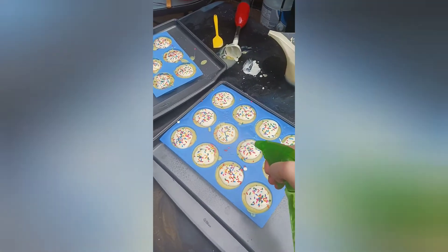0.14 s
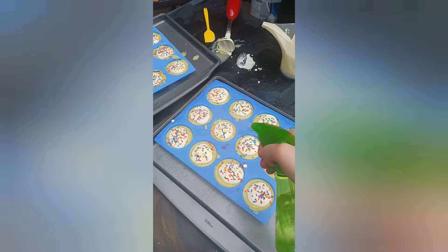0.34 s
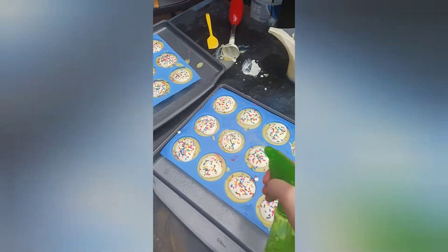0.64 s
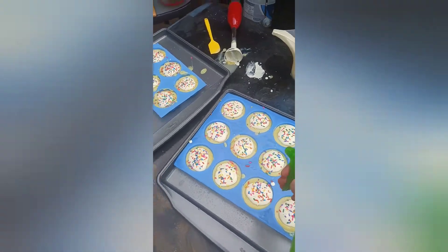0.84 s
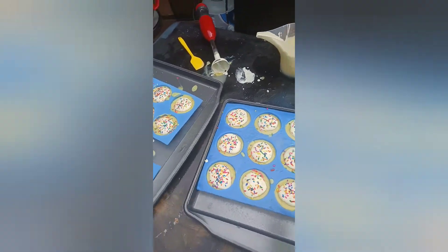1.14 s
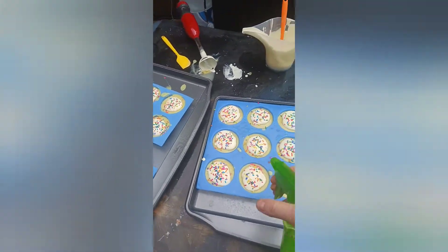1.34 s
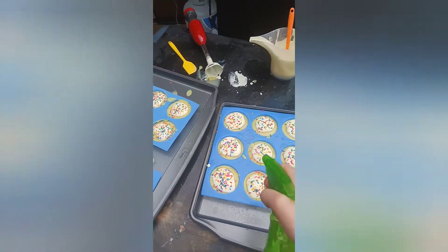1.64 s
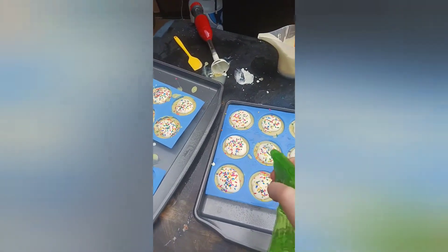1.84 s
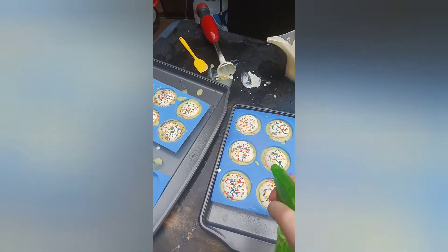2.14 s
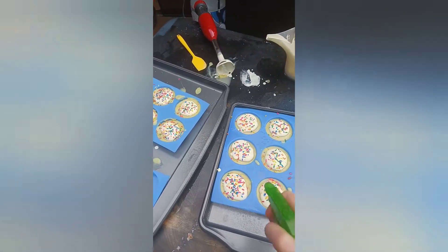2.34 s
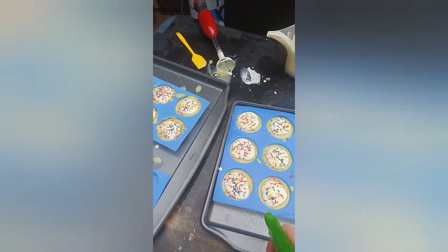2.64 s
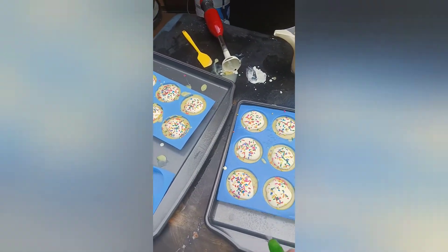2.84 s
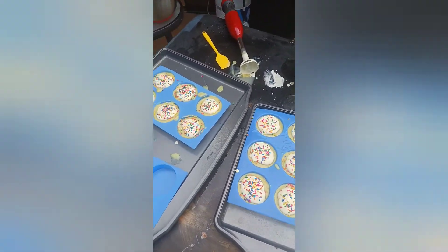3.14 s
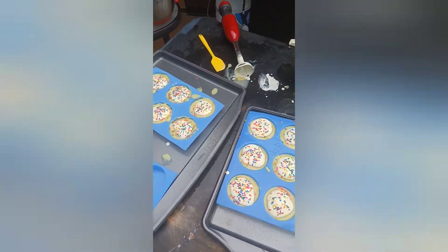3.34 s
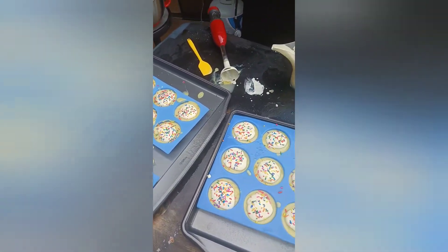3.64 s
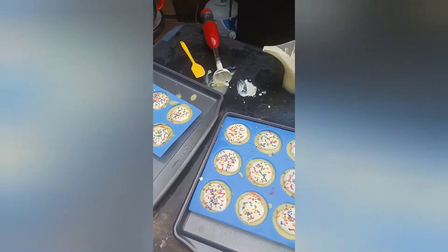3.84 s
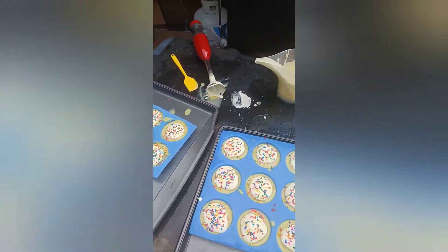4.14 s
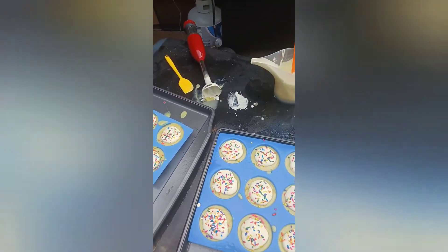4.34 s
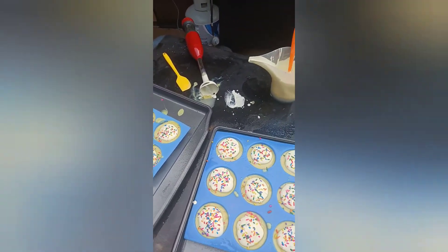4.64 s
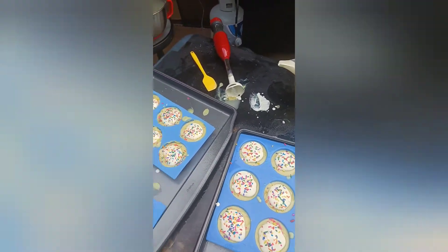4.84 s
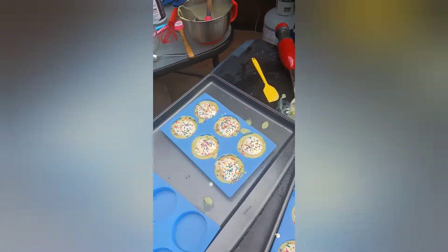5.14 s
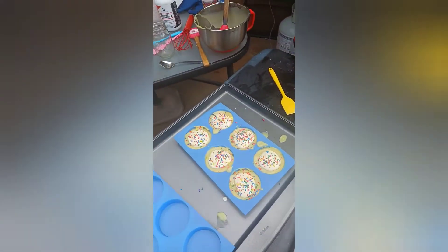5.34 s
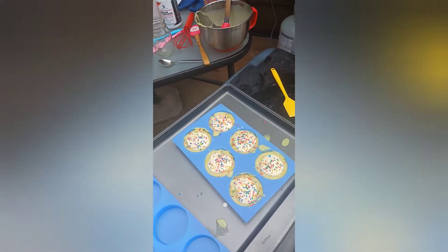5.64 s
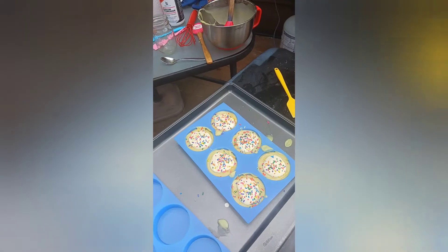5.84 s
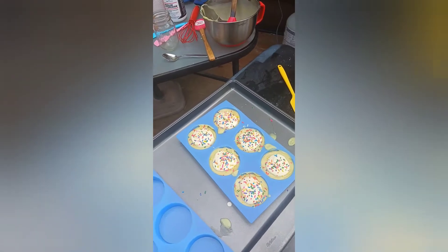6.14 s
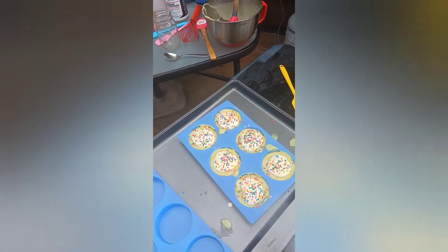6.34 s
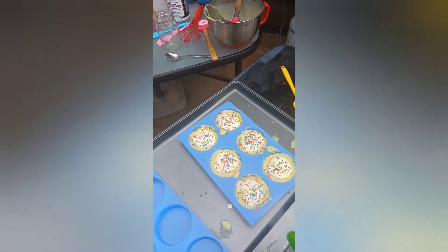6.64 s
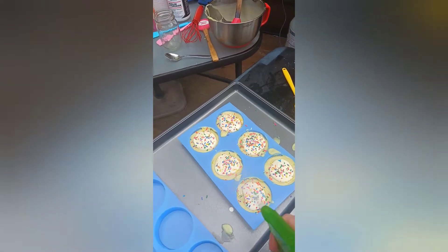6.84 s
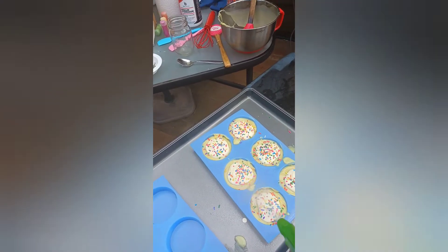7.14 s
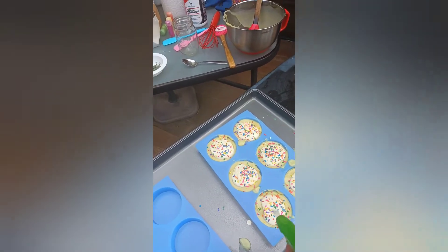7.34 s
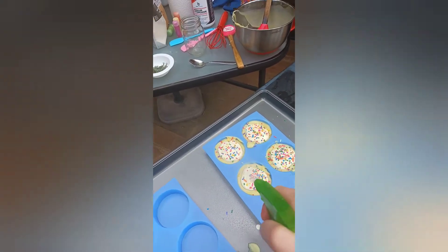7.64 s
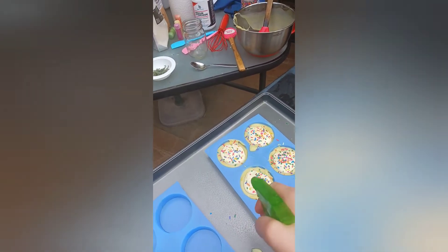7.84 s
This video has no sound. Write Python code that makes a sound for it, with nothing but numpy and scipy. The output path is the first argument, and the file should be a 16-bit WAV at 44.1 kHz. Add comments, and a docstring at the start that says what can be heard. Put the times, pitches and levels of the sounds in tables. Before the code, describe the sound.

A plastic trigger spray bottle works close to the microphone outdoors for about eight seconds. From 0 to 1.2 s the squirts are uneven and sputtering, broken by air spits and small crackles. A pause with a soft wet rustle follows until about 1.5 s, then pumping resumes, spluttery at first. From about 2.5 s it becomes a regular beat of nearly four squeezes a second: hollow plastic knock, snapping spit, bright airy hiss of a tenth of a second, then a faint gurgling suck as the trigger returns. A short gap falls near 4.8 to 5.1 s, and the even rhythm continues to the end. The spray is crisp on the left. The right is muffled and much boomier: irregular deep thumps, strongest around 0.5 to 0.8, 3.4, 4.5, 4.9 and 5.7 s, with cover rattle and low wind rumble. Faint background hiss stays beneath.

```python
"""Trigger sprayer beside two ports

A trigger bottle is pumped about four times a second outdoors. The open left port hears the valve
knock, the nozzle spit and hiss and the pump refill: coloured noise under level curves, and ringing modes.
The covered right port booms with handling and wind, and passes the bottle muffled.
Table levels in dB apply ahead of the port gain."""
import sys
import numpy as np
from scipy import signal
from scipy.fft import rfft, irfft, next_fast_len
from scipy.io import wavfile

SR = 44100
rng = np.random.default_rng(int(sys.argv[2]) if len(sys.argv) > 2 else 0)


def waveform_to_disk(signal):
    """Save audio, clipped to [-1, 1], as 16-bit WAV at the path in sys.argv[1]."""
    frames = np.transpose(np.atleast_2d(signal))
    scaled = np.clip(frames, -1, 1) * 32767
    samples = np.round(scaled).astype(np.int16)
    wavfile.write(sys.argv[1], SR, samples)


N = 351918


def amp(db):
    """Decibels to gain."""
    return 10 ** (np.asarray(db) / 20)


def in_time(rows):
    """Interpolate each column of a curve at every sample; the first column is time in seconds."""
    s, *columns = np.transpose(rows)
    return [np.interp(np.arange(N) / SR, s, column) for column in columns]


def coloured(x, spectrum):
    """Filter by a (Hz, dB) spectrum, interpolated over log frequency."""
    size = next_fast_len(N)
    hz, db = np.transpose(spectrum)
    bin_hz = np.arange(size // 2 + 1) * SR / size
    gain = amp(np.interp(np.log(bin_hz + 1), np.log(hz), db))
    return irfft(rfft(x, size) * gain, size)[:N]


def noise(spectrum):
    """Steady coloured noise of rms 1."""
    x = coloured(rng.standard_normal(N), spectrum)
    return x / x.std()


def flicker(rate_hz):
    """Noise smoothed by two poles at rate_hz, scaled to spread 1."""
    r = np.exp(-2 * np.pi * rate_hz / SR)
    x = signal.lfilter([1], [1, -2 * r, r * r], rng.standard_normal(N + SR))[SR:]
    return x / x.std()


def patchy(spectrum, patch_db, rate_hz):
    """Coloured noise whose half-octave bands from 500 Hz up swell and sink independently."""
    whole = rfft(noise(spectrum))
    hz = np.arange(N // 2 + 1) * SR / N
    edges_hz = 500 * 2 ** np.arange(0, 5.6, .5)
    bands = [irfft(whole * ((hz >= low) & (hz < high)), N) for low, high in zip(edges_hz, edges_hz[1:])]
    return sum(band * amp(patch_db * flicker(rate_hz)) for band in bands)


def ringing(hz, t60_s, count):
    """A decaying sine of initial height 1."""
    t = np.arange(count) / SR
    return np.sin(2 * np.pi * hz * t) * amp(-60 * t / t60_s)


def plateau(t, s, length_s, top, rise_per_s, fall_per_s):
    """A level that climbs in a straight line to a flat top and sinks again."""
    return top - rise_per_s * np.maximum(s - t, 0) - fall_per_s * np.maximum(t - s - length_s, 0)


def add(out, s, sound):
    """Mix a sound in at a time in seconds."""
    at = round(s * SR)
    out[at:at + len(sound)] += sound[:N - at]


# Sputter from air in the liquid. Each row: time in seconds, depth in dB.
SPUTTER = [(0, 5), (1.5, 5), (3, 6), (3.6, 2), (5, 2), (8, 1)]
# Jet, refill, liquid and gurgle spectra. Each row: frequency in Hz, density in dB per Hz.
JET_SPECTRUM = [(2350, -42), (4000, -10), (4900, -14), (5900, -12.5), (7900, -10.5), (8900, -15),
                (10300, -7), (12600, 1), (14000, -4.5), (15700, -3), (16200, -67), (16500, -38)]
REFILL_SPECTRUM = [(2350, -49), (4000, -40), (4700, -9.5), (5400, -9.5), (6100, -5), (7770, -7),
                   (8900, -0.5), (10000, -3.5), (12200, -3), (13600, -1), (15700, -8), (16200, -39)]
LIQUID_SPECTRUM = [(530, -54), (900, -20), (1300, -9), (1650, -6), (2000, -7), (2600, -3), (3300, -3),
                   (4300, -5.5), (5500, -5), (7150, -30), (12100, -100)]
GURGLE_SPECTRUM = [(700, -23.5), (1300, -15.5), (1750, -6.5), (2100, -11.5), (2480, -2), (2800, -6.5),
                   (3200, -3), (3500, -7.5), (3850, -13), (4500, -13.5), (5400, -8.5), (6200, -10.5),
                   (8000, -48)]
REFILL_BELOW_DB, REFILL_BLEND_DB = -60, 2.0
REFILL_UNEVENNESS_DB = 3


def spray():
    """Squeezes force out a bright jet hiss over liquid noise; in the quiet part the pump sucks up liquid."""
    hiss_db, liquid_db, rustle = pump()
    jet = 1 / (1.5 + np.exp((REFILL_BELOW_DB - hiss_db) / REFILL_BLEND_DB))  # power share, at most 2/3
    depth_db = jet * in_time(SPUTTER)[0] + (1 - jet) * REFILL_UNEVENNESS_DB
    sputter = 2 * np.tanh(flicker(74) / 2)  # bounded swings

    bright = np.sqrt(jet) * patchy(JET_SPECTRUM, patch_db=0.99, rate_hz=14.0)
    bright += np.sqrt(1 - jet) * noise(REFILL_SPECTRUM)
    bright *= amp(depth_db * (sputter + 0.59 * flicker(210)))

    broad = np.clip(np.maximum(jet, rustle), 0, 1)
    dull = np.sqrt(broad) * patchy(LIQUID_SPECTRUM, patch_db=2.27, rate_hz=15.4)
    dull += np.sqrt(1 - broad) * patchy(GURGLE_SPECTRUM, patch_db=1.88, rate_hz=8.0)
    dull *= amp(liquid_db + depth_db * (0.72 * sputter + 0.15 * flicker(86)))
    return amp(hiss_db) * (bright + dull)


# Trigger squeezes. Each row: valve open in seconds, time to full pressure in seconds, length in seconds
# (at least the time to full pressure), hiss on opening in dB, hiss at full pressure in dB,
# liquid noise at full pressure in dB relative to the hiss.
SQUEEZES = [(0.0, 0.016, 0.065, -67, -53, -17), (0.043, 0.056, 0.088, -61.5, -42.5, -14.5),
            (0.287, .01, 0.12, -51, -55.5, -3.5), (0.373, 0.024, 0.041, -56, -44, -11),
            (0.622, .003, 0.0076, -48, -47, -16.5), (0.658, 0.014, .02, -61, -56, -1),
            (0.682, 0.013, 0.026, -49, -35.5, -10.5), (0.752, 0.0084, 0.017, -56, -55.5, -10),
            (0.997, 0.022, 0.025, -64, -55.5, -12.5), (1.115, 0.034, 0.058, -47, -43.5, -10),
            (1.502, .021, 0.048, -67, -57.5, -16), (1.557, 0.044, 0.13, -60, -45.5, -13),
            (1.825, .01, 0.071, -55, -51, -10.5), (1.887, 0.033, 0.094, -57, -41.5, -14.5),
            (2.097, 0.086, 0.15, -56.5, -42.5, -15), (2.361, 0.028, 0.074, -51, -49.5, -11.5),
            (2.458, 0.012, 0.013, -42.5, -42.5, -11), (2.59, 0.085, 0.13, -43.5, -46.5, -13),
            (2.838, 0.051, .1, -58, -44, -13), (3.088, 0.049, 0.11, -53, -45, -13),
            (3.327, 0.073, 0.12, -55, -47.5, -12.5), (3.581, 0.082, 0.13, -59.5, -46.5, -11),
            (3.835, 0.077, .11, -60.5, -50.5, -9), (4.101, 0.083, 0.11, -58.5, -51, -9.5),
            (4.358, 0.056, 0.11, -60.5, -47.5, -12), (4.607, 0.1, .12, -57.5, -54, -8.5),
            (5.147, .003, 0.0052, -47, -52, -24), (5.164, 0.069, 0.12, -66.5, -47, -10.5),
            (5.479, 0.054, 0.13, -61, -50, -9.5), (5.735, 0.06, .1, -54.5, -49.5, -10),
            (6.007, 0.08, 0.092, -54.5, -47, -11.5), (6.267, 0.078, .11, -54, -46, -12),
            (6.536, 0.083, 0.12, -54.5, -47, -11), (6.811, 0.073, 0.12, -56.5, -47, -10),
            (7.071, 0.083, 0.094, -55.5, -45.5, -11.5), (7.34, 0.062, .11, -57, -47.5, -9),
            (7.614, 0.08, 0.11, -55, -49, -10), (7.891, 0.062, .12, -55, -47.5, -11)]
OPEN_S, SAG_DB_PER_S, SHUT_DB_PER_S = 0.0072, 158, 655
LIQUID_FOLLOWS = 0.68  # share of the hiss's dB swing
# Refills as the trigger springs back. Each row: plateau start in seconds, length in seconds, hiss in dB,
# gurgle in dB relative to the hiss.
REFILLS = [(0.169, 0.042, -69, 2.5), (0.461, 0.04, -73.5, 6), (0.788, 0.063, -73.5, 6),
           (0.92, 0.027, -81.5, 6.5), (1.044, 0.088, -62.5, -4), (1.207, 0.22, -71.5, 5),
           (1.72, 0.018, -75, 4.5), (2.002, .03, -75, 4), (2.263, 0.041, -73.5, 1.5),
           (2.507, 0.048, -71, -3.5), (2.753, 0.039, -71, -1), (2.955, .02, -73, 2), (3.023, 0.03, -73, -1),
           (3.237, 0.075, -74.5, -1), (3.485, 0.073, -72, 2), (3.74, 0.054, -74.5, 2),
           (4.0, 0.066, -73, -2.5), (4.26, 0.074, -76, 0), (4.51, 0.072, -68.5, -1),
           (4.777, 0.067, -71.5, -2), (5.373, 0.096, -74.5, -3), (5.632, 0.073, -72, -2),
           (5.923, 0.067, -73.5, 2.5), (6.168, 0.079, -71, -0.5), (6.447, 0.043, -69.5, 2),
           (6.72, 0.067, -67.5, -2), (7.002, 0.036, -64.5, -6.5), (7.265, 0.063, -72, -5),
           (7.505, 0.072, -70.5, 0), (7.809, 0.043, -64.5, -5)]
SUCK_RISE_DB_PER_S, SUCK_FALL_DB_PER_S = 900, 505
GURGLE_SHARE, GURGLE_DB_PER_S = 0.15, 308  # flat top as a share of the refill; slope
# Soft broad rustles in longer pauses, in place of the gurgle.
# Each row: plateau start in seconds, length in seconds, level in dB.
RUSTLES = [(1.221, 0.19, -63), (4.954, 0.12, -78)]
RUSTLE_FADE_DB_PER_S, RUSTLE_BLEND_S = 300, 0.074
REST_DB, REST_LIQUID_DB, SILENT_DB = -81.5, -81.5, -120


def pump():
    """Hiss dB, liquid dB relative to it, rustle share: the loudest of rest, squeezes, refills and rustles."""
    t = np.arange(0, N / SR + .002, .001)
    hiss = np.full(len(t), float(REST_DB))
    liquid = np.full(len(t), float(REST_LIQUID_DB))
    for s, swell_s, length_s, open_db, full_db, liquid_db in SQUEEZES:
        # opens fast, swells to full pressure, sags, collapses
        length_s = max(length_s, swell_s)
        shut_db = full_db - SAG_DB_PER_S * (length_s - swell_s)
        silent_s = length_s + (shut_db - SILENT_DB) / SHUT_DB_PER_S
        times = s + np.array([-OPEN_S, 0, swell_s, length_s, silent_s])
        level = np.interp(t, times, [REST_DB, open_db, full_db, shut_db, SILENT_DB], left=SILENT_DB)
        hiss = np.maximum(hiss, level)
        liquid = np.maximum(liquid, full_db + liquid_db + LIQUID_FOLLOWS * (level - full_db))
    for s, length_s, db, gurgle_db in REFILLS:
        level = plateau(t, s, length_s, db, SUCK_RISE_DB_PER_S, SUCK_FALL_DB_PER_S)
        puff_s = s + length_s * (1 - GURGLE_SHARE) / 2  # puff centred in the refill
        puff = plateau(t, puff_s, length_s * GURGLE_SHARE, db + gurgle_db, GURGLE_DB_PER_S, GURGLE_DB_PER_S)
        hiss, liquid = np.maximum(hiss, level), np.maximum(liquid, puff)
    rustle = np.zeros(len(t))
    for s, length_s, db in RUSTLES:
        level = plateau(t, s, length_s, db, RUSTLE_FADE_DB_PER_S, RUSTLE_FADE_DB_PER_S)
        share = plateau(t, s, length_s, 1, 1 / RUSTLE_BLEND_S, 1 / RUSTLE_BLEND_S)
        liquid, rustle = np.maximum(liquid, level), np.maximum(rustle, share)
    return in_time(np.transpose([t, hiss, liquid - hiss, rustle]))


# Air pockets and valve snaps. Each row: start in seconds, peak of the bright envelope in dB.
SPITS = [(0.0125, -64), (0.0652, -50), (0.0844, -38), (0.261, -49), (0.1727, -50), (0.2727, -45),
         (0.292, -48), (0.3136, -61), (0.3545, -42), (0.3627, -47), (0.3836, -39), (0.3909, -36),
         (0.4295, -48), (0.6845, -37), (0.7566, -45), (1.0197, -51), (1.0609, -48), (1.1163, -35.5),
         (1.5226, -62), (1.5565, -48), (1.5782, -35.5), (1.592, -36), (1.6038, -35.5), (1.807, -42.5),
         (1.906, -36), (1.921, -30), (1.96, -51), (2.0924, -46.5), (2.1446, -35), (2.1755, -35),
         (2.206, -51), (2.2795, -55), (2.3557, -36.5), (2.3867, -57), (2.4066, -41), (2.439, -40),
         (2.446, -42.5), (2.4592, -42), (2.5827, -33), (2.6149, -32), (2.6326, -45), (2.66, -45),
         (2.6686, -33), (2.7305, -43), (2.8396, -32), (2.8573, -35), (2.8638, -33), (2.9117, -29),
         (2.996, -49.5), (3.0993, -42), (3.12, -40), (3.13, -49), (3.1355, -38.5), (3.2544, -54),
         (3.33, -35), (3.3555, -45), (3.397, -43), (3.4914, -54), (3.524, -54), (3.5838, -32.5),
         (3.603, -31.5), (3.6165, -38), (3.7182, -54), (3.832, -41), (4.0117, -54), (4.0973, -34),
         (4.1258, -42), (4.243, -55), (4.3584, -34.5), (4.3651, -40.5), (4.5436, -53.5), (4.6085, -35),
         (4.7005, -44), (4.728, -46), (5.1865, -44.5), (5.4778, -32), (5.587, -46), (5.6015, -48),
         (5.648, -53.5), (5.7358, -33.5), (5.7517, -44), (5.8243, -51), (5.8445, -49), (5.8622, -47.5),
         (5.9124, -62), (5.9537, -53), (6.0097, -33), (6.0246, -54), (6.1446, -54), (6.2675, -33),
         (6.2788, -37), (6.5355, -33.5), (6.5534, -45), (6.712, -51), (6.7313, -50), (6.81, -31.5),
         (6.833, -34), (6.841, -42), (7.0473, -49), (7.0737, -30), (7.2555, -60), (7.3329, -34),
         (7.3498, -42), (7.3571, -45), (7.519, -57), (7.5614, -51), (7.604, -34.5), (7.6305, -44),
         (7.6435, -47), (7.652, -39), (7.8913, -30), (7.9183, -48)]
# Bright spit spectrum. Each row: frequency in Hz, density in dB per Hz.
SNAP_SPECTRUM = [(2350, -50), (4000, -27), (5840, -7), (7890, -11.5), (8840, -2), (10400, -10.5),
                 (12200, 0.5), (14900, -7), (16800, -6)]
SPIT_T60_S, DULL_T60_S = 0.018, 0.011
DULL_AT_MEAN_DB, DULL_FOLLOWS, MEAN_SPIT_DB = -58.5, 0.61, -43  # the dull part swings less than the snap
TICKS_PER_S, TICK_MAX_DB, TICK_SPREAD_DB = 12, -60.5, 8.5  # faint spits at random


def spits():
    """Each spit is a sudden puff of bright noise gone in milliseconds, with a dull part that dies faster."""
    bright, dull, t = np.zeros(N), np.zeros(N), np.arange(2600) / SR
    puff, dull_puff = [(1 - np.exp(-t / 0.00015)) * amp(-60 * t / t60_s) for t60_s in (SPIT_T60_S, DULL_T60_S)]
    chance = rng.random((200, 2))
    tick_times = np.cumsum(-np.log(chance[:, 0])) / TICKS_PER_S
    tick_levels = TICK_MAX_DB - TICK_SPREAD_DB * chance[:, 1]
    ticks = [(s, db) for s, db in zip(tick_times, tick_levels) if s < N / SR]
    for s, db in list(SPITS) + ticks:
        dull_db = DULL_AT_MEAN_DB + DULL_FOLLOWS * (db - MEAN_SPIT_DB)
        add(bright, s, amp(db) * puff / puff.max())
        add(dull, s, amp(dull_db) * dull_puff / dull_puff.max())
    return bright * noise(SNAP_SPECTRUM) + dull * noise(LIQUID_SPECTRUM)


# The trigger takes up the piston. Each row: start in seconds, level in dB.
KNOCKS = [(0.262, -61.5), (1.809, -63.5), (2.096, -65), (2.358, -58.5), (2.582, -67), (2.839, -54),
          (3.328, -55.5), (3.581, -53), (3.835, -59.5), (4.099, -57), (4.359, -54), (4.609, -59),
          (5.479, -55.5), (5.735, -62), (6.008, -58), (6.269, -57), (6.537, -59.5), (6.811, -53.5),
          (7.075, -53.5), (7.331, -57), (7.603, -57.5), (7.892, -51.5)]
# Bottle modes. Each row: frequency in Hz, level in dB, T60 in seconds.
BOTTLE_MODES = [(353, 0.5, 0.051), (1054, -15, 0.1), (1313, -4, 0.048), (1602, -4.5, 0.04),
                (1760, -0.5, 0.019), (2440, -9, 0.039), (2930, -10, 0.022)]


def knocks():
    """The trigger chatters into contact for milliseconds and sets the plastic bottle's modes ringing."""
    out = np.zeros(N)
    modes = sum(amp(db) * ringing(hz, t60_s, count=4000) for hz, db, t60_s in BOTTLE_MODES)
    decay = np.exp(-np.arange(260) / SR / 0.0034)
    chatter = rng.standard_normal((len(KNOCKS), 260)) ** 3 * decay  # cubing makes it spiky
    for (s, db), contact in zip(KNOCKS, chatter):
        add(out, s, amp(db) * np.convolve(contact / np.linalg.norm(contact), modes))
    return out


# Piston rub. Each row: time in seconds, level in dB.
RUB = [(0, -95), (.6, -99), (.67, -78), (.74, -92), (1.79, -101), (1.82, -78), (1.92, -80), (1.97, -98),
       (2.08, -95), (2.11, -76), (2.25, -79), (2.29, -93), (7.98, -100.5)]
# Bottle hum spectrum. Each row: frequency in Hz, density in dB per Hz.
BOTTLE_HUM_SPECTRUM = [(150, -40), (250, -4), (310, 4), (420, -7), (700, -36)]


def piston_rub():
    """The rubbing piston makes the bottle hum: low noise on an unsteady level."""
    return amp(in_time(RUB)[0] + 6.0 * flicker(25)) * noise(BOTTLE_HUM_SPECTRUM)


# Bumps on the covered port. Each row: start in seconds, edge level in dB, boom level in dB.
BUMPS = [(0.111, -48, -32), (0.2082, -48, -30), (0.2725, -42, -38), (0.2956, -48, -47),
         (0.5157, -18.5, -16.5), (0.5286, -46, -20.5), (0.5737, -15.5, -9.5), (0.6008, -22, -16),
         (0.643, -46, -49), (0.6937, -37, -36), (0.7982, -17.5, -15.5), (1.036, -32, -19.5),
         (1.1074, -40, -44), (1.161, -39, -26.5), (1.2145, -55, -27.5), (1.301, -56, -30), (1.52, -57, -26),
         (1.665, -42.5, -30.5), (2.0243, -22, -17), (2.104, -44, -24.5), (2.586, -33, -28.5),
         (2.7844, -34.5, -40.5), (3.0505, -38, -38.5), (3.1447, -47, -28), (3.3893, -32.5, -32),
         (3.4202, -20.5, -13.5), (3.4522, -35, -23.5), (3.5724, -39.5, -20), (3.7608, -47, -35.5),
         (3.878, -46, -34.5), (3.927, -56, -43), (4.288, -52, -38), (4.3281, -40, -24), (4.4538, -21, -15),
         (4.834, -48.5, -26), (4.8835, -24.5, -15), (4.9523, -45.5, -44), (5.1168, -49, -40),
         (5.16, -34.5, -28), (5.643, -53, -34), (5.7345, -13.5, -14), (6.1607, -45, -33.5),
         (6.3975, -60, -20.5), (6.6246, -60, -32.5), (6.915, -39, -25.5), (7.566, -57, -30),
         (7.6628, -57, -35), (7.703, -33, -22.5), (7.9003, -32.5, -23), (7.938, -39, -22),
         (7.9463, -29.5, -27)]
BASE_EDGE_S, BUMP_T60_S = 0.00066, 0.085
CAVITY_HZ, GLIDE_HZ, GLIDE_S = 64.1, 167, 0.0043  # air under the cover; extra start pitch of a hard bump


def bumps():
    """A bump is a sharp pressure cusp; the air under the cover then swings back and rings."""
    out, t = np.zeros(N), np.arange(6000) / SR
    signs = rng.choice([-1, 1], len(BUMPS))
    after = np.maximum(t - .0045, 0)
    for (s, edge_db, boom_db), sign in zip(BUMPS, signs):
        hardness = np.clip(1.5 + (edge_db - boom_db) / 24, 0, 1)  # harder starts higher
        width_s = BASE_EDGE_S * amp(np.clip(0.85 * (boom_db - edge_db), -6, 3))  # little boom: thin click
        cusp = np.exp(-np.hypot(t - .004, 0.44 * width_s) / width_s)
        glide_turns = hardness * GLIDE_HZ * GLIDE_S * (1 - np.exp(-after / GLIDE_S))
        swing = np.sin(2 * np.pi * (CAVITY_HZ * after + glide_turns))
        swing *= (1 - np.exp(-after / 0.0045)) * amp(-60 * after / BUMP_T60_S)
        add(out, s - .002, sign * (amp(boom_db) * swing - amp(edge_db) * cusp))
    return out


# Cover rattle spectrum. Each row: frequency in Hz, density in dB per Hz.
RATTLE_SPECTRUM = [(80, -13), (160, 0.5), (300, -3.5), (500, -10), (900, -29), (2000, -50), (5000, -63)]
BUMP_RATTLE_DB, BUMP_RATTLE_T60_S = -14.5, 0.046  # dB relative to the bump edge
KNOCK_RATTLE_DB, KNOCK_RATTLE_T60_S = -7.5, 0.13  # dB relative to the knock


def cover_rattle():
    """Bumps and trigger knocks shake the cover: decaying bursts of flickering noise."""
    shake, t = np.zeros(N), np.arange(6000) / SR
    for s, edge_db, _ in BUMPS:
        decay = amp(edge_db + BUMP_RATTLE_DB - 60 * t / BUMP_RATTLE_T60_S)
        add(shake, s, decay * (1 - np.exp(-t / 0.00078)))
    for s, db in KNOCKS:
        decay = amp(db + KNOCK_RATTLE_DB - 60 * t / KNOCK_RATTLE_T60_S)
        add(shake, s, decay * (1 - np.exp(-t / 0.005)))
    return shake * amp(5.6 * np.tanh(flicker(40.4))) * noise(RATTLE_SPECTRUM)


# Cover transmission. Each row: frequency in Hz, gain in dB.
COVER_GAIN = [(300, -0.5), (800, -15), (1500, -20), (2500, -24), (6000, -37), (12000, -37), (14000, -39),
              (16000, -15)]
LEAK_DB, LEAK_T60_S = -6.5, .25


def leak(x):
    """Bottle sound reaches the covered port muffled and scattered over many short paths."""
    t = np.arange(12000) / SR
    paths = rng.standard_normal(12000) * amp(-60 * t / LEAK_T60_S)
    muffled = coloured(x, COVER_GAIN)
    return amp(LEAK_DB) * signal.fftconvolve(muffled, paths / np.linalg.norm(paths))[:N]


# Boom in the covered port. Each row: time in seconds, level in dB.
BOOM = [(0.0, -41), (0.62, -32.5), (0.84, -45), (1.71, -43.5), (2.04, -43), (2.2, -43), (3.0, -43.5),
        (3.22, -42.5), (3.47, -41.5), (3.84, -44), (5.09, -40), (5.36, -47), (5.71, -35), (5.93, -44),
        (6.75, -48.5), (6.91, -40.5), (7.31, -49), (7.98, -42.5)]
# Boom spectrum. Each row: frequency in Hz, density in dB per Hz.
BOOM_SPECTRUM = [(10, -38), (25, -13), (40, -3.5), (56, 2.5), (72, -3.5), (95, -15), (130, -18),
                 (200, -37.5), (300, -45.5), (500, -57), (900, -67), (2000, -110)]
# Brief boom surges. Each row: peak time in seconds, peak level in dB.
SURGES = [(0.59, -33), (1.082, -32.5), (1.55, -39), (2.07, -50), (2.57, -41.5), (3.428, -26.5),
          (3.59, -32.5), (4.321, -36), (4.47, -30.5), (4.89, -33), (5.13, -25), (5.749, -26.5),
          (6.422, -33.5), (6.638, -35.5), (6.931, -30.5), (7.578, -35), (7.702, -32)]
SURGE_RISE_DB_PER_S, SURGE_FALL_DB_PER_S, BOOM_WAVER_DB = 241, 204, 3


def boom():
    """Handling and wind boom in the covered port: low noise on a wavering level with brief surges."""
    t, level = np.arange(N) / SR, in_time(BOOM)[0]
    for s, db in SURGES:
        level = np.maximum(level, plateau(t, s, 0, db, SURGE_RISE_DB_PER_S, SURGE_FALL_DB_PER_S))
    return amp(level + BOOM_WAVER_DB * flicker(7.3)) * noise(BOOM_SPECTRUM)


# Wind spectrum. Each row: frequency in Hz, density in dB per Hz.
WIND_SPECTRUM = [(18, -13), (40, -2), (65, 4), (110, -22), (170, -40), (300, -30)]
WIND_DB, GUST_DB, GUST_RATE_HZ = -81.5, 9.5, 1.3


def wind():
    """Low wind on the open port: rumbling noise with random gusts."""
    level = WIND_DB + GUST_DB * flicker(GUST_RATE_HZ) + 1.5 * flicker(8.9)
    return amp(level) * noise(WIND_SPECTRUM)


# Hush spectrum. Each row: frequency in Hz, density in dB per Hz.
HUSH_SPECTRUM = [(100, -0.5), (200, 0.5), (480, -1), (800, -6.5), (1500, -11.5), (3000, -40), (8000, -39),
                 (16000, -8), (16300, -50)]
HUSH_DB = -83.5


def hush():
    """A faint, nearly steady background noise."""
    return amp(HUSH_DB + 0.54 * flicker(16)) * noise(HUSH_SPECTRUM)


# Faint hum that passes once. Each row: time in seconds, level in dB.
HUM = [(0, -110), (.76, -110), (.79, -77), (1.0, -87), (1.06, -110), (7.98, -110)]
# Hum spectrum. Each row: frequency in Hz, density in dB per Hz.
HUM_SPECTRUM = [(400, -60), (460, 2), (480, -4), (500, -12), (580, -60)]


def passing_hum():
    """A narrow band of noise rises once and fades."""
    return amp(in_time(HUM)[0]) * noise(HUM_SPECTRUM)


def scene():
    """Bottle and air at the open left port; boom, bumps and leak at the covered right port."""
    bottle = spray() + spits() + knocks() + piston_rub()
    left = bottle + wind() + hush() + passing_hum()
    right = boom() + bumps() + cover_rattle() + leak(bottle)
    return np.array([left, right])


PORT_GAIN_DB, CIRCUIT_HISS_DB, STOPBAND_HZ = 6.5, -86, 16950


def record(dry):
    """Port gain, a faint circuit hiss, a steep top cut."""
    wet = amp(PORT_GAIN_DB) * dry + amp(CIRCUIT_HISS_DB) * rng.standard_normal(dry.shape)
    top_cut = signal.cheby2(12, 70, STOPBAND_HZ, fs=SR, output="sos")  # 70 dB down from STOPBAND_HZ up
    return signal.sosfilt(top_cut, wet)


dry = scene()
out = record(dry)
waveform_to_disk(out)
```